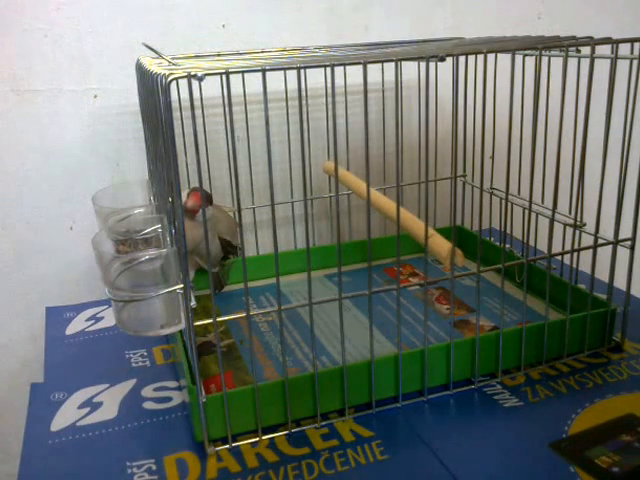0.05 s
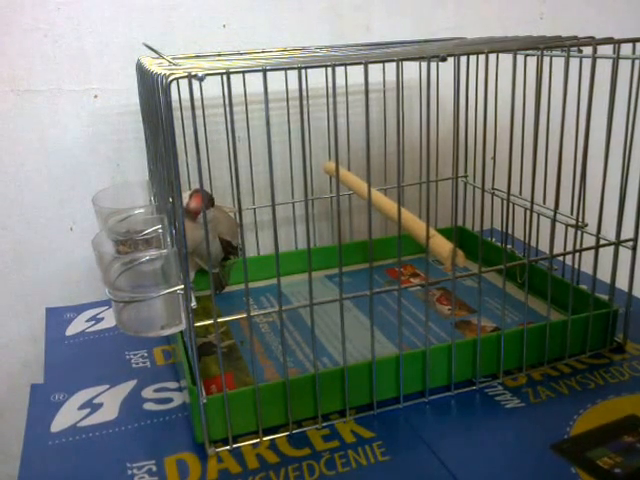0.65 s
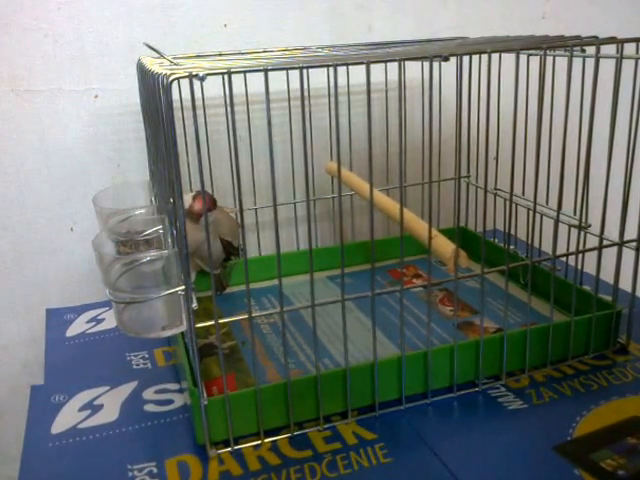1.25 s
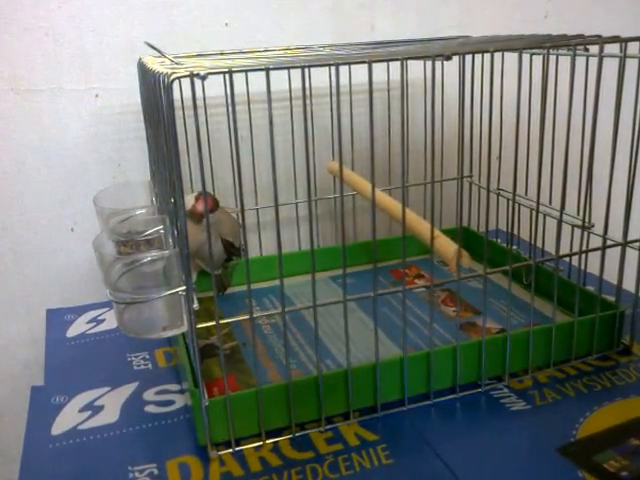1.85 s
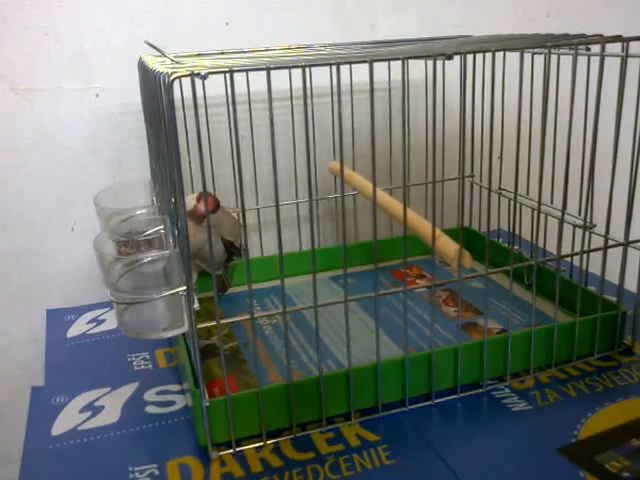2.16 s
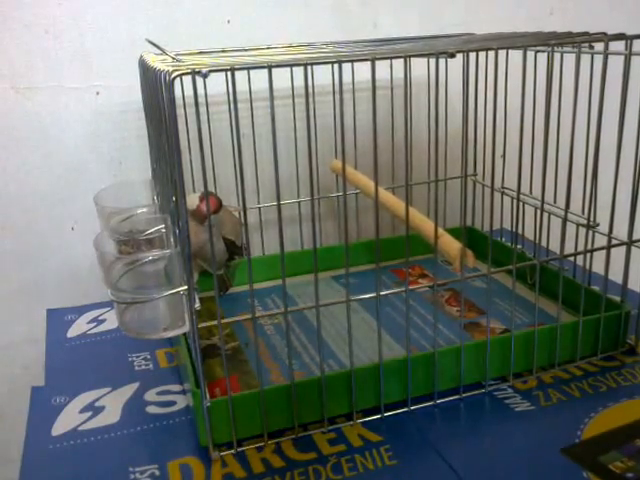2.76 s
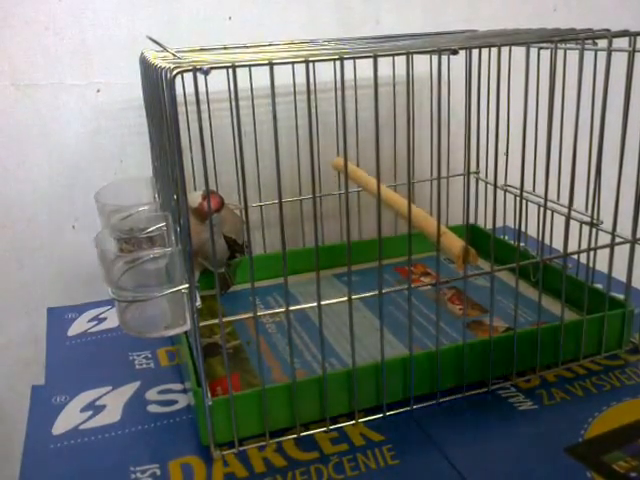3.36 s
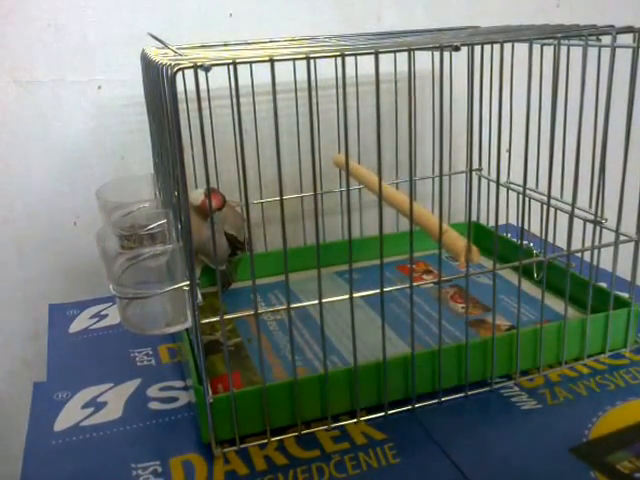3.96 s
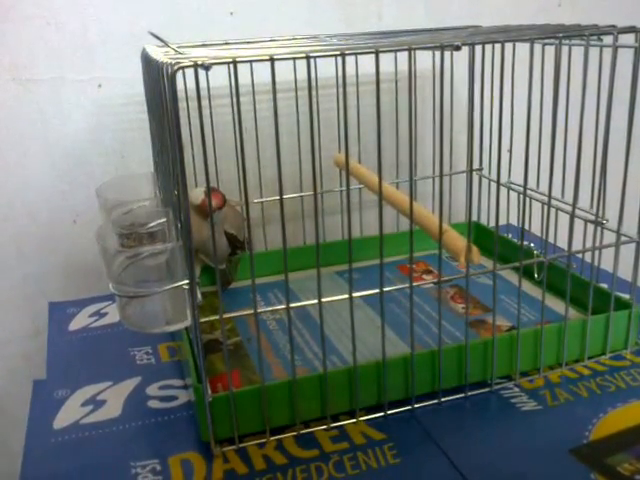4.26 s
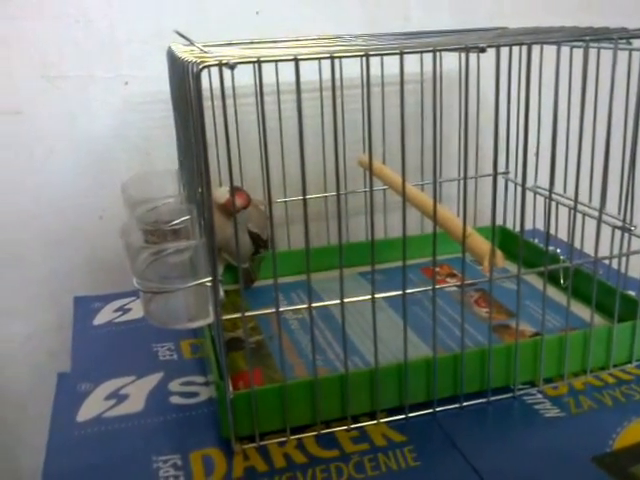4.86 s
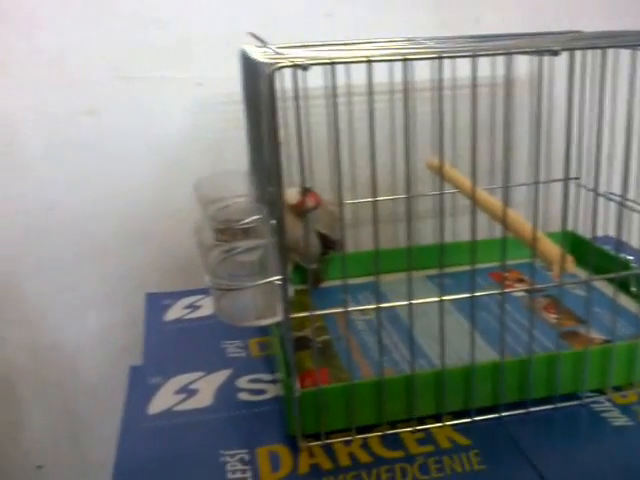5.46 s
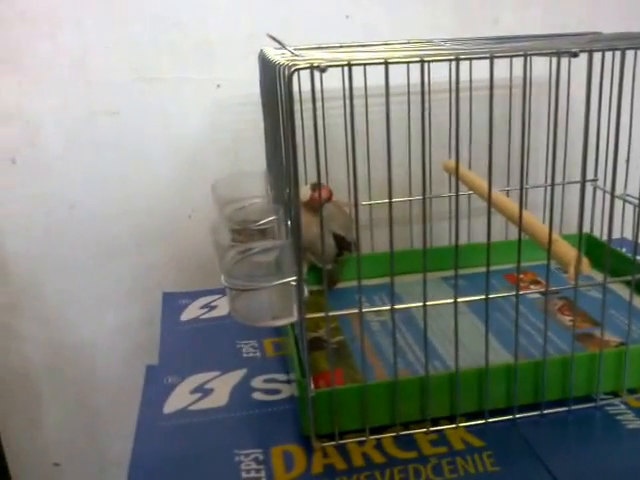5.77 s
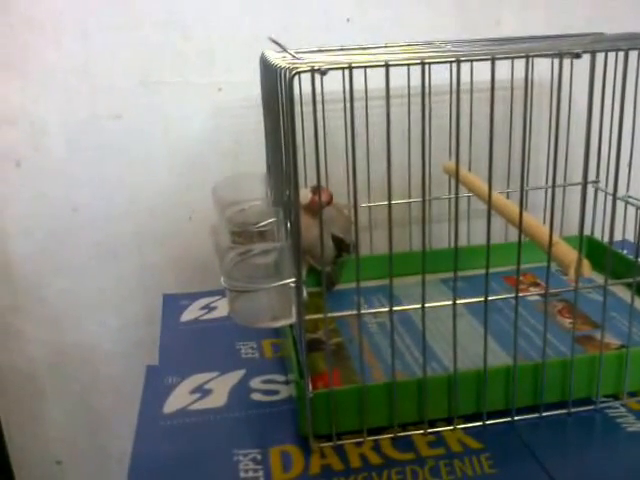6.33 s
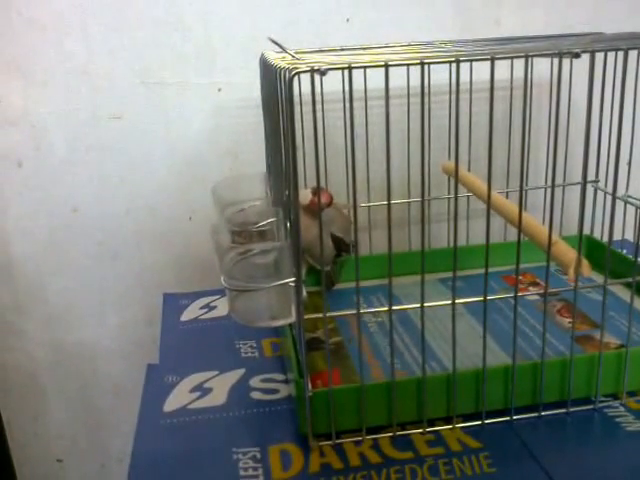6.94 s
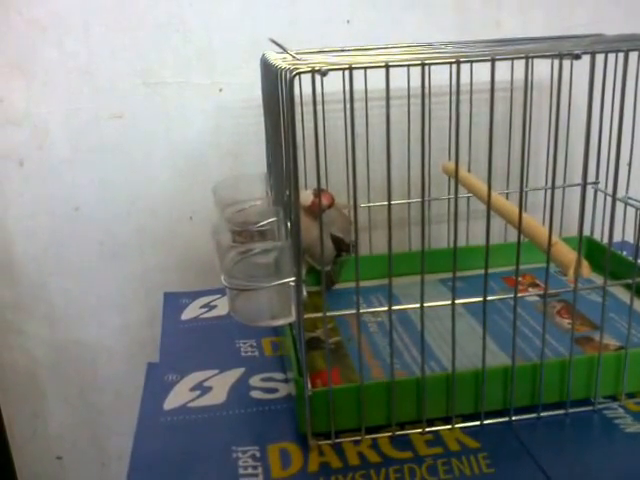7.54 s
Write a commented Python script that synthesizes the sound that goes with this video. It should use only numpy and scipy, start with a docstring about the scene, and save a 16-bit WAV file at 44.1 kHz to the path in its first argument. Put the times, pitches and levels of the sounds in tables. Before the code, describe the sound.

A caged finch gives nasal mewing cries and short chirps in a small room, with a few microphone handling clicks later on.

```python
"""A finch in a small room

A caged finch makes nasal mewing cries, rising two-voiced chirps, a hoarse purr and soft peeps.
The two sides of its voice box (the syrinx) sound alone or together, and the walls add a short echo.
Something rustles softly, and a hand-held recorder creaks and thumps as it is moved."""
import sys
import numpy as np
from scipy import signal
from scipy.fft import rfft, irfft
from scipy.io import wavfile
from scipy.ndimage import uniform_filter1d

SR = 44100
rng = np.random.default_rng(int(sys.argv[2]) if len(sys.argv) > 2 else 0)


def inscribe(sig):
    """Save sig as 16-bit PCM at rate SR to the path in sys.argv[1].

    A 1-D sig is mono; a 2-D sig holds one channel per row.
    Samples are clipped to [-1, 1] before scaling.
    """
    pcm = np.round(np.clip(np.atleast_2d(sig).T, -1, 1) * 32767)
    wavfile.write(sys.argv[1], SR, pcm.astype(np.int16))


N = 339570
TIME = np.arange(N) / SR

# Levels in the tables are starting points: the functions turn them up or down.
# Nasal cries: start_s, length_s, from_hz, crest_hz, goal_hz, end_bend_share, crest_s, swell_db,
# piercing_db, mellow_db, edge_db, fade_db_per_s, treble_limit_hz
CRIES = [(0.579, 0.17, 748.7, 792, 841, 0.0077, 0.075, 4, -29, -31.5, -27, 55, 13000),
         (1.38, 0.3698, 738, 782.8, 878, -0.027, 0.075, 4, -28, -29, -27.5, 78, 14000),
         (3.489, 0.53, 682, 812.8, 879.1, 0.097, 0.2, 14.5, -26.5, -30.5, -25.5, 101.5, 15000),
         (5.281, 0.4029, 751.5, 798.8, 895, -0.057, .115, 2.5, -23.5, -24, -27.5, 112.5, 13110),
         (5.775, 0.18, 747.5, 757, 788, 0.0, 0.12, -1.5, -38.5, -43.5, -29, 123.5, 8730),
         (7.333, .4, 748.3, 780.7, 895.3, 0.00645, 0.093, 4, -23, -27.5, -27.5, 99, 15760)]
# Moments when a cry breaks into a rasp: middle_s, width_s, boost_db
VOICE_BREAKS = [(0.746, 0.062, 4), (3.59, 0.028, 13), (5.878, 0.1, 2.5), (7.52, 0.13, 5)]
# How the throat shapes the piercing voice: frequency_hz, level_db
PIERCING_COLOUR = [(1400, -33.5), (2300, -12.5), (3200, -7.5), (3900, -13), (4700, 7), (5400, -3)]
# The mellow voice's harmonics (whole multiples of the pitch): multiple, level_db
MELLOW_HARMONICS = [(2, -12), (4, 5), (8, -30.5), (10, -30), (12, -39.5), (14, -48)]
# A cry's bright edge, made of its high harmonics: frequency_hz, level_db
EDGE_COLOUR = [(5000, 0.5), (5600, -0.5), (6500, -9.5), (7300, -18.5), (8500, -25.5), (11500, -26),
               (13000, -39.5), (15500, -45)]
# Air rasping in the throat: frequency_hz, level_db
RASP_COLOUR = [(1400, -46), (2100, -10), (2900, -1.5), (4400, 7.5), (6000, -1.5), (7500, -12.5),
               (11500, -25.5), (15500, -38.5)]
# Notes of the voice box's low side: start_s, length_s, from_hz, to_hz, arch_hz, base_db, octave_db,
# octave_opens_s, third_vs_octave_db
LOW_NOTES = [(2.1, 0.17, 2072, 2148, 135, -53.5, -40.5, 0.1166, -17),
             (3.423, 0.12, 2085, 2180, 33.5, -47, -38.5, .022, -6.5),
             (4.673, .195, 2083, 2125, 130.5, -52, -40, 0.063, -26),
             (5.752, 0.183, 2062, 2341, 70.5, -48.5, -43.5, 0.0106, -12),
             (6.152, .2, 2063, 2207, 123.5, -49.5, -35, 0.05, -38),
             (7.468, 0.14, 2170, 1985, -42, -46, -38.5, 0.0046, -27)]
# Notes of its high side: start_s, length_s, from_hz, leap_after_s, leap_hz, base_db, octave_db, leap_db
HIGH_NOTES = [(0.715, 0.04734, 2700, 0.017, 2920, -40, -17, 5),
              (2.127, 0.1987, 2412, 0.1545, 2860, -52, -41, 11.5),
              (4.707, 0.2, 2456, .158, 2790, -48, -37.5, 5), (6.185, 0.22, 2415, .16, 2800, -48, -35, 4.5),
              (7.522, 0.13, 2487, 0.1, 2790, -46, -41, 9)]
# Breath around the chirps: frequency_hz, level_db
BREATH_COLOUR = [(1400, -34.5), (2300, -13), (3400, -6), (4800, 0.5), (6300, -6.5), (7500, -13.5),
                 (11500, -27), (14000, -38)]
# Soft peeps: start_s, length_s, from_hz, to_hz, level_db, octave_vs_level_db, hoarseness
PEEPS = [(0.275, 0.046, 4660, 4920, -49, -36.5, .3), (0.38, 0.0487, 2935, 3120, -59, -20, 0.7),
         (0.43, 0.0504, 3850, 4450, -59, -29, 1.23), (1.269, .045, 2698, 2708, -51.5, -28, 0.53),
         (1.278, 0.032, 3750, 3780, -52.5, -36, 0.98), (1.359, 0.054, 2660, 2810, -53, -26, 0.69),
         (2.019, 0.048, 3676, 3740, -61, -27.5, 0.58), (2.491, 0.0556, 3200, 3101, -63, -18, .5),
         (2.666, 0.061, 3103, 3123, -62.5, -14.5, 0.46), (2.876, 0.061, 2570, 2550, -54.5, -9, 0.47),
         (2.908, 0.048, 2618, 2764, -50, -22.5, 0.85), (3.036, 0.0414, 3030, 3041, -57, -21, 0.26),
         (3.051, .03, 3650, 3580, -60, -21, 0.63), (4.523, 0.0319, 4550, 4643, -55.5, -30, .4),
         (4.632, 0.042, 3080, 3040, -59.5, -29, 0.34)]
# Creaks and bumps of the recorder's case: start_s, click_db, snap_vs_click_db, thump_db
KNOCKS = [(4.26, -57, -16.5, -47), (4.407, -55.5, -15, -51.5), (4.495, -50.5, -18, -54),
          (4.519, -40, -11, -34), (4.715, -50, -17.5, -38.5), (4.837, -40, -18, -37),
          (4.878, -43, -2.5, -37.5), (4.979, -56, -19.5, -61), (5.004, -59.5, -16, -39),
          (5.12, -69.5, -17.5, -43), (5.292, -29.5, -13, -39.5), (5.73, -27.5, -14.5, -59.5),
          (5.861, -27.5, -16.5, -43), (6.253, -20, 1.5, -36.5), (6.485, -21.5, 3.5, -34.5),
          (7.02, -40, -17, -62), (7.306, -63, -25, -46), (7.433, -20.5, 2.5, -42), (7.626, -42, -10, -40),
          (7.661, -40, -17, -43.5)]
# Ringing tones of the case: pitch_hz, level_db, ring_s (time to fade by 60 dB)
CASE_TONES = [(783.8, -9, 0.023), (1095, -6, 0.013), (1943, -1.5, 0.0089), (2773, -5, 0.0071),
              (4000, -4.5, 0.0063), (5260, -5.5, 0.0052), (6640, -7.5, 0.02), (7740, -14.5, 0.01056),
              (10047, -7.5, 0.0082)]
# Low tones of its body: pitch_hz, level_db, ring_s
THUMP_TONES = [(79.5, -15.5, 0.053), (144.2, -1, 0.0558), (209.9, -7.5, 0.092), (316, -16, 0.039)]
# Dry rustles of feathers: start_s, length_s, level_db
FEATHER_RUSTLES = [(0.263, 0.0614, -51), (0.882, .035, -75), (0.952, 0.038, -60.5), (2.883, .07, -63),
                   (4.482, 0.069, -62.5), (6.703, 0.047, -42), (7.091, 0.1273, -54)]
# The feathers' hiss: frequency_hz, level_db
FEATHER_COLOUR = [(1500, -4), (3000, -3), (4500, 0), (6300, 4.5), (8500, -10), (14000, -25)]
# Soft rubs: start_s, length_s, body_db, scratch_db
RUBS = [(1.062, 0.072, -85.5, -66.5), (2.492, 0.31, -62, -84), (2.864, 0.12, -57.5, -72.5),
        (3.252, 0.09, -61.5, -64), (4.178, 0.077, -73.5, -59), (4.367, 0.065, -65, -64.5),
        (4.821, 0.067, -58.5, -54.5), (4.924, 0.1143, -55, -52.5), (5.036, 0.23, -65.5, -67),
        (5.446, 0.23, -60, -50), (6.35, 0.066, -62.5, -52.5), (6.9, 0.19, -65, -60),
        (7.121, .11, -57.5, -52.5)]
# The dull body of a rub: frequency_hz, level_db
RUB_BODY_COLOUR = [(200, -8.5), (330, 4.5), (450, 2.5), (750, -6.5), (1200, -13.5), (3000, -39.5)]
# Its scratchy top: frequency_hz, level_db
RUB_SCRATCH_COLOUR = [(600, -13), (1100, -12.5), (1700, -6.5), (2300, -13.5), (4000, -23), (8000, -13.5)]
# How long the room echoes: frequency_hz, ring_s
ECHO_TIMES = [(500, .34), (3000, .28), (6000, .24), (9000, .17), (15000, .11)]
# Where the noise suppressor starts to close: frequency_hz, threshold_db
QUIET_LIMITS = [(200, -95.5), (1000, -84), (2000, -67), (3500, -61.5), (6000, -66), (9000, -67.5),
                (15000, -81)]
# Rumble of the hand, still at first, then shifting its grip: time_s, level_db
GRIP_LEVELS = [(0.0, -74.5), (0.7, -72.5), (2.0, -78.5), (3.8, -71), (4.4, -74.5), (4.7, -56), (5.0, -52.5),
               (5.5, -58), (5.95, -57), (6.12, -77.5), (6.35, -57.5), (6.6, -64.5), (7.3, -59.5),
               (7.7, -59.5)]
# The depth of that rumble: frequency_hz, level_db
GRIP_COLOUR = [(32, -15), (50, 3.5), (70, 1.5), (150, -7.5), (220, -13), (300, -9), (500, -17)]
# Steady hum and a thin whine: pitch_hz, level_db
HUM_TONES = [(54, -81.5), (297, -82), (6675, -91.5)]
# Two low tones that beat against each other: pitch_hz, level_db
DRONE_TONES = [(53.8, -59), (67.5, -62)]
# Hiss of the still room: frequency_hz, level_db
HISS_COLOUR = [(25, -14.5), (55, -12.5), (100, -12), (170, -17.5), (300, -17.5), (500, -15.5), (1500, -18),
               (3000, -22.5), (4500, -24), (6500, -24), (8000, -30.5), (11000, -38), (15500, -44.5)]


def cries(rise_s=.125, bend_s=.055, mellow_lag_db=28, mellow_grow_s=.09, odd_loss_db=-9):
    """A cry starts piercing; as it mellows, odd harmonics fade and it seems to rise an octave."""
    out = np.zeros(N)
    for (start, length, from_hz, crest_hz, goal_hz, bend, crest_s, swell_db,
         piercing_db, mellow_db, edge_db, fade_db_per_s, limit_hz) in CRIES:
        t0, age, on = note(start, length, fade=.03)
        size = len(age)
        # the pitch climbs to a crest, eases toward its goal, then bends as the air runs out
        past_crest = np.maximum(age - crest_s, 0)
        pitch = np.interp(age, [0, crest_s], [from_hz, crest_hz])
        pitch += (goal_hz - crest_hz) * (1 - np.exp(-past_crest / rise_s))
        pitch *= 1 + bend * np.exp((age - length) / bend_s)
        # levels in dB: the mellow voice starts far down and catches up
        swell = -swell_db * ease_out(age, crest_s)
        faded = fade_db_per_s * past_crest
        piercing = piercing_db + swell - faded
        mellow = mellow_db + swell - mellow_lag_db * np.exp(-age / mellow_grow_s)
        calm = from_db(mellow) / (from_db(mellow) + from_db(piercing))   # 0 piercing, 1 mellow
        closing = calm * ease_out(length - age, span_s=.11)   # the closing beak dulls the end
        mellow -= 2 * closing
        edge = edge_db + swell - .58 * faded - 13 * closing
        harsh_db = sum(db * np.exp(-((start + age - s) / width) ** 2) for s, width, db in VOICE_BREAKS)
        scoop = 1 - .04 * np.exp(-age / .02)   # the pitch slides up as pressure builds
        phase = vibrate(pitch * scoop, jitter=.0072 * from_db(harsh_db / 2), rate_hz=240)
        beak = 1 - np.exp(-(age / .023) ** 2)   # the opening beak lets the treble out a moment later
        voice = sum(tone(round(k) * phase, mellow - 7 + db) for k, db in MELLOW_HARMONICS)
        for k in (2, 3, 5, 6):
            level = piercing - 2 + at_hz(PIERCING_COLOUR, k * pitch) + k % 2 * calm * odd_loss_db
            voice += tone(k * phase, level + 3.56 * drift(23, size))
        for k in range(7, 20):
            level = edge - 3 + at_hz(EDGE_COLOUR, k * pitch) + k % 2 * calm * odd_loss_db
            blur = .06 * (k - 6) * drift(130, size)   # the highest harmonics are the least steady
            offset = rng.uniform(0, 2 * np.pi)
            voice += beak * tone(k * phase + blur + offset, level + 3.8 * drift(67, size))
        voice *= 1 + .18 * (1 - calm) * drift(220, size)   # the membrane flutters until the cry mellows
        # air escapes in puffs, once a cycle, most of all before the membranes get going
        effort = np.sqrt(from_db(piercing) ** 2 + from_db(edge) ** 2 + from_db(mellow + 1) ** 2)
        air = effort * from_db(harsh_db - 17) * (1 + 3 * np.exp(-age / .03))
        voice += air * noise(RASP_COLOUR, size) * (1 + .6 * np.cos(phase))
        attack = 1 - .44 * np.exp(-age / .015)
        treble_limit = signal.butter(4, min(limit_hz, .45 * SR), fs=SR, output="sos")
        add(out, t0, signal.sosfilt(treble_limit, on * attack * voice))
    return out


def chirps(sum_tone_db=-6, breath_db=-14):
    """Both sides of the voice box shake each other, adding a tone at the sum of their pitches."""
    low, low_phase, low_strength = voice_side(low_note, LOW_NOTES, gain_db=3, jitter=.0088)
    high, high_phase, high_strength = voice_side(high_note, HIGH_NOTES, gain_db=-1, jitter=.01)
    sum_tone = np.sqrt(low_strength * high_strength) * tone(low_phase + high_phase, sum_tone_db)
    breath = np.hypot(low_strength, high_strength) * from_db(breath_db) * noise(BREATH_COLOUR)
    return low + high + sum_tone + breath


def voice_side(shape_note, rows, gain_db, jitter):
    """One membrane sings three harmonics; returns its sound, its phase and its octave's strength."""
    sound, phases, strength = np.zeros((3, N))
    for row in rows:
        t0, on, pitch, base_db, octave_db, third_db = shape_note(*row)
        phase = vibrate(pitch, jitter, rate_hz=260)
        shimmer = 1 + .3 * drift(220, len(on))
        voice = tone(phase, base_db) + tone(2 * phase, octave_db) + tone(3 * phase, octave_db + third_db)
        add(sound, t0, on * shimmer * from_db(gain_db) * voice)
        add(phases, t0, phase)
        add(strength, t0, on * from_db(gain_db + octave_db))
    return sound, phases, strength


def low_note(start, length, from_hz, to_hz, arch_hz, base_db, octave_db, open_s, third_db):
    """The low side bends its pitch in an arch; its octave fades in and its base tone weakens."""
    t0, age, on = note(start, length, fade=.02)
    progress = age / length
    pitch = from_hz + (to_hz - from_hz) * progress + arch_hz * arch(progress)
    sink_db = 3.5 * progress ** 2
    shut_db = 38.5 * ease_out(age, open_s)
    return t0, on, pitch, base_db - sink_db, octave_db - shut_db, third_db


def high_note(start, length, from_hz, leap_after_s, leap_hz, base_db, octave_db, leap_db,
              third_db=-30, glide_hz_per_s=1800):
    """The high side glides up, then leaps to a louder, steady closing pitch."""
    t0, age, on = note(start, length, fade=.02)
    leapt = .5 + .5 * np.tanh((age - leap_after_s) / .0017)
    pitch = (1 - leapt) * (from_hz + glide_hz_per_s * age) + leapt * leap_hz
    push_db = leap_db * leapt
    shut_db = 38.5 * ease_out(age, span_s=.085)
    return t0, on, pitch, base_db + push_db, octave_db + push_db - shut_db, third_db


def whistle(pitch_hz=3436, level_db=-35, fade_db_per_s=74):
    """A thin, fading whistle over one chirp."""
    out = np.zeros(N)
    t0, age, on = note(start=4.793, length=.071, fade=.0074)
    phase = vibrate(np.full(len(age), pitch_hz), jitter=.0032, rate_hz=120)
    add(out, t0, on * tone(phase, level_db - fade_db_per_s * age))
    return out


def purr(start_s=6.7, length_s=.31, pitch_hz=2425, sag_hz=62.6, throb_hz=27):
    """A slack membrane rattles in quick throbs, sagging in pitch and swelling in the middle."""
    out = np.zeros(N)
    t0, age, on = note(start_s, length_s, fade=.035)
    middle = arch(age / length_s)
    phase = vibrate(pitch_hz - sag_hz * middle, jitter=.028, rate_hz=260)
    swell_db = 6.5 * middle
    voice = sum(tone(k * phase, db + swell_db) for k, db in enumerate((-43.5, -57, -72, -78), 1))
    voice += from_db(-45.5 - 67.5 * age) * noise(RASP_COLOUR, len(age))   # the rasp dies away
    throb = 1 + .227 * np.sin(vibrate(np.full(len(age), throb_hz), jitter=.15, rate_hz=12))
    add(out, t0, on * throb * voice)
    return out


def peeps(hoarse_jitter=.096):
    """Quiet gliding notes, made hoarse by an unsteady pitch."""
    out = np.zeros(N)
    for start, length, from_hz, to_hz, level_db, octave_db, hoarseness in PEEPS:
        t0, age, on = note(start, length, fade=.0099)
        pitch = from_hz + (to_hz - from_hz) * age / length
        phase = vibrate(pitch, hoarseness * hoarse_jitter, rate_hz=400)
        add(out, t0, on * (tone(phase, level_db) + tone(2 * phase, level_db + octave_db)))
    return out


def knocks(slip_s=.0056, slip_db=-17, treble_from_hz=3300):
    """The plastic case slips and rings: snaps ring its high tones, and the jolt thumps its body."""
    clicks, snaps, pushes = np.zeros((3, N))
    t = TIME[:SR // 40]
    for start, click_db, snap_db, thump_db in KNOCKS:
        for lag_s, share_db in ((-.014, -17), (0, -4), (.0105, -11)):   # light tick, creak, spring back
            slip = from_db(slip_db) * rng.standard_normal(len(t)) * np.exp(-t / slip_s)
            slip[0] = 1   # one sharp click leads the tiny after-slips
            add(clicks, start + lag_s, from_db(click_db + share_db) * slip)
            add(snaps, start + lag_s, from_db(click_db + share_db + snap_db) * slip)
        add(pushes, start, from_db([thump_db]))
    case = sum((-1) ** k * from_db(db) * ring(clicks if hz < treble_from_hz else snaps, hz, ring_s)
               for k, (hz, db, ring_s) in enumerate(CASE_TONES))
    thump = sum(from_db(db) * ring(pushes, hz, ring_s) for hz, db, ring_s in THUMP_TONES)
    return case + from_db(-4) * snaps + thump


def rustles():
    """Feathers and rubbed surfaces catch and slip, so their noise comes in uneven grains."""
    feathers, body, scratch = np.zeros((3, N))
    for start, length, level_db in FEATHER_RUSTLES:
        t0, _, on = note(start, length, fade=.062)
        add(feathers, t0, on * from_db(level_db))
    for start, length, body_db, scratch_db in RUBS:
        t0, _, on = note(start, length, fade=.079)
        add(body, t0, on * from_db(body_db))
        add(scratch, t0, on * from_db(scratch_db))
    grains = rms_one(from_db(2.5 * drift(70, N)))
    return grains * (feathers * noise(FEATHER_COLOUR) + body * noise(RUB_BODY_COLOUR)
                     + scratch * noise(RUB_SCRATCH_COLOUR))


def room_echo(sound, gain_db=-4, build_s=.003):
    """Near walls throw back a dense echo whose treble dies first."""
    t, tail = TIME[:SR // 2], 0
    edges_hz = np.geomspace(200, 16000, 10)
    for low, high in zip(edges_hz, edges_hz[1:]):
        band_filter = signal.butter(2, [low, high], "band", fs=SR, output="sos")
        band = signal.sosfilt(band_filter, rng.standard_normal(len(t)))
        ring_s = at_hz(ECHO_TIMES, np.sqrt(low * high))
        decay = from_db(-60 * t / ring_s) * (1 - np.exp(-t / build_s))
        tail = tail + band * decay / np.sqrt(np.sum(decay ** 2))
    return from_db(gain_db) * signal.fftconvolve(sound, tail)[:N]


def suppress_noise(sound):
    """The recorder turns down each frequency band as it falls quiet, cutting the echoes short."""
    hz, _, frames = signal.stft(sound, SR, nperseg=512, noverlap=384)
    power = 16 * uniform_filter1d(np.abs(frames) ** 2, size=12, axis=0)
    gain = power / (np.abs(power) + from_db(at_hz(QUIET_LIMITS, hz))[:, None] ** 2)
    return signal.istft(frames * gain, SR, nperseg=512, noverlap=384)[1][:N]


def hand_rumble(lumps_db=4, jolt_db=-12, jolt_s=.026):
    """The hand's grip rumbles unevenly, and each knock stirs it up."""
    grip = from_db(np.interp(TIME, *np.transpose(GRIP_LEVELS)) - 1)
    grip *= rms_one(from_db(lumps_db * drift(5.6, N)))
    for start, _, _, thump_db in KNOCKS:
        add(grip, start, from_db(thump_db + jolt_db) * np.exp(-TIME[:SR // 4] / jolt_s))
    return uniform_filter1d(grip, size=400) * noise(GRIP_COLOUR)


def background(hiss_db=-74):
    """Room hiss, a faint hum, and a low drone that swells near the end."""
    hum = sum(tone(2 * np.pi * hz * TIME, db) for hz, db in HUM_TONES)
    drone = sum(tone(2 * np.pi * hz * TIME, db) for hz, db in DRONE_TONES)
    drone *= gate(TIME, start=6.66, end=7.66, fade=.13)
    return hum + drone + from_db(hiss_db) * noise(HISS_COLOUR)


def from_db(db):
    """Turn decibels into a multiplier."""
    return 10 ** (np.asarray(db) / 20)


def rms_one(x):
    """Scale a signal so its average strength (rms) is 1."""
    return x / np.sqrt(np.mean(x ** 2) + 1e-20)


def at_hz(points, hz):
    """Read between a table's rows, with frequency spaced by octaves."""
    known_hz, value = np.transpose(points)
    return np.interp(np.log(np.maximum(hz, 1)), np.log(known_hz), value)


def noise(colour, size=N):
    """Noise of strength 1, shaped by a colour table and falling away beyond its ends."""
    hz = np.fft.rfftfreq(size, 1 / SR) + 1
    ends = 1 / (1 + (colour[0][0] / hz) ** 8) / (1 + (hz / colour[-1][0]) ** 8)
    white = rfft(rng.standard_normal(size))
    return rms_one(irfft(white * from_db(at_hz(colour, hz)) * ends, size))


def drift(rate_hz, size):
    """A smooth random wander of strength 1; a higher rate wanders faster."""
    r = np.exp(-2 * np.pi * rate_hz / SR)
    return rms_one(signal.lfilter([1], [1, -2 * r, r * r], rng.standard_normal(size + 4000))[4000:])


def add(out, start, sound):
    """Mix a sound in at a time in seconds."""
    i = max(int(start * SR), 0)
    out[i:i + len(sound)] += sound[:max(N - i, 0)]


def gate(t, start, end, fade):
    """Fade smoothly on and off, half open at start and end."""
    return np.sin(np.pi / 2 * np.clip(np.minimum(t - start, end - t) / fade + .5, 0, 1)) ** 2


def note(start, length, fade):
    """When a note's lead-in begins, its age in seconds at each sample, and its on-off curve."""
    t = np.arange(int((start - fade) * SR), int((start + length + fade) * SR)) / SR
    return t[0], np.clip(t - start, 0, length), gate(t, start, start + length, fade)


def vibrate(pitch, jitter, rate_hz):
    """Phase (progress through the cycles) of a vibration whose pitch trembles."""
    return 2 * np.pi * np.cumsum(pitch * (1 + jitter * drift(rate_hz, len(pitch)))) / SR


def tone(phase, level_db):
    """A pure tone at this average level."""
    return np.sqrt(2) * from_db(level_db) * np.sin(phase)


def ring(clicks, hz, ring_s):
    """Each click starts a tone that fades by 60 dB in ring_s."""
    r, w = from_db(-60 / (ring_s * SR)), 2 * np.pi * hz / SR
    return signal.lfilter([0, np.sin(w)], [1, -2 * r * np.cos(w), r * r], clicks + 1e-18)


def arch(progress):
    """0 at both ends of a note, 1 in its middle."""
    return 4 * progress * (1 - progress)


def ease_out(age, span_s):
    """Ease from 1 down to 0 over this span."""
    return np.clip(1 - age / span_s, 0, 1) ** 2


def scene():
    """The bird in its room and small noises near the microphone, over a faint background."""
    bird = cries() + chirps() + whistle() + purr() + peeps()
    near = knocks() + rustles()
    echo = room_echo(bird + from_db(-22.5) * near)
    return (suppress_noise(bird + near + echo) + hand_rumble() + background())[None]


def record(dry, cutoff_hz=15750):
    """Cut off the very highest treble steeply."""
    return signal.sosfilt(signal.ellip(10, .1, 90, cutoff_hz, fs=SR, output="sos"), dry)


dry = scene()
out = record(dry)
inscribe(out)
```